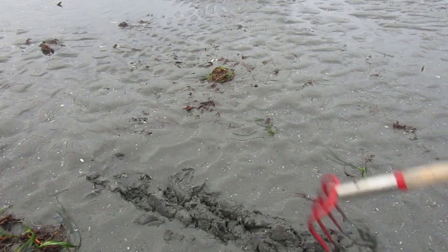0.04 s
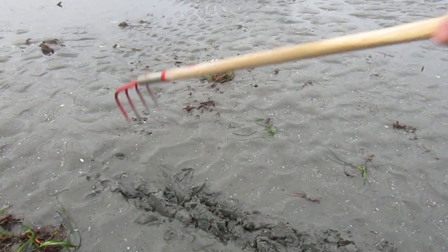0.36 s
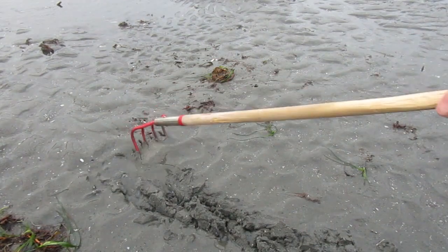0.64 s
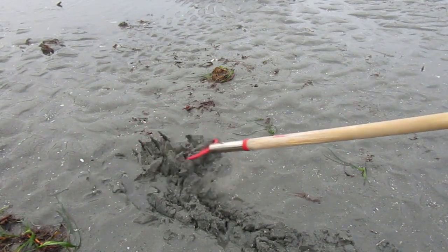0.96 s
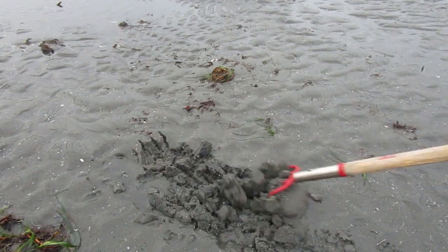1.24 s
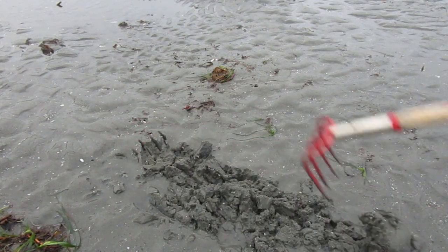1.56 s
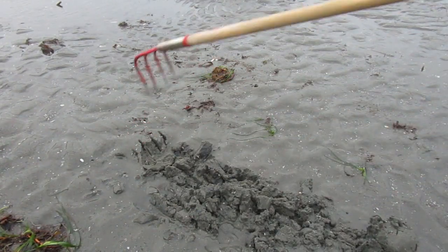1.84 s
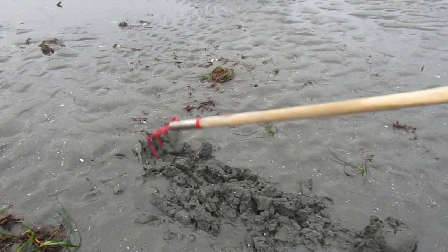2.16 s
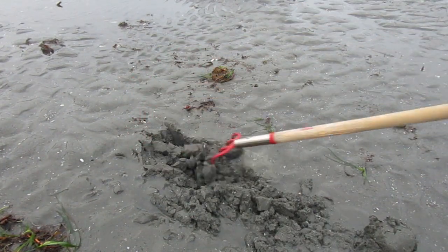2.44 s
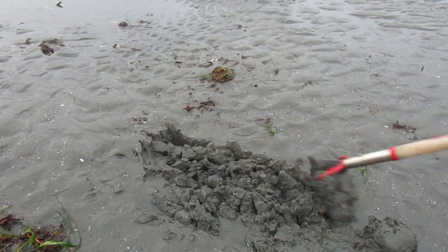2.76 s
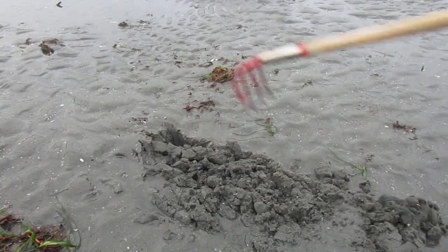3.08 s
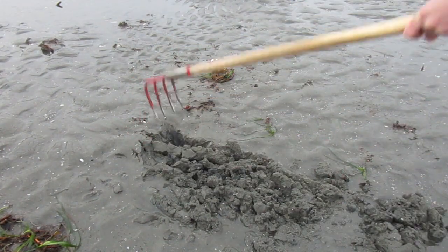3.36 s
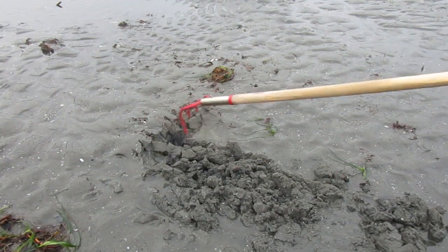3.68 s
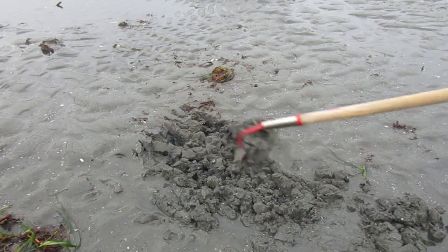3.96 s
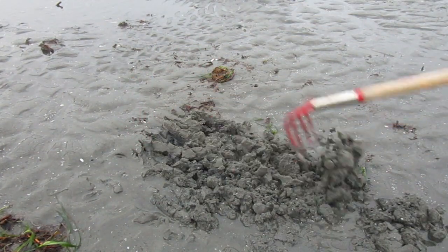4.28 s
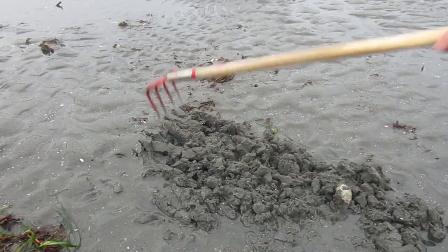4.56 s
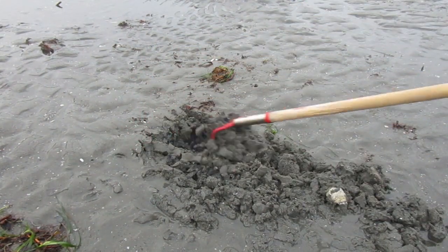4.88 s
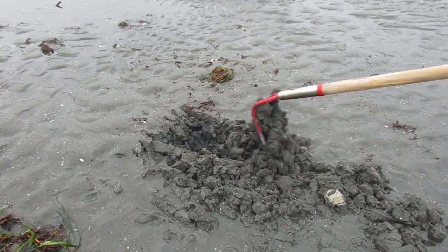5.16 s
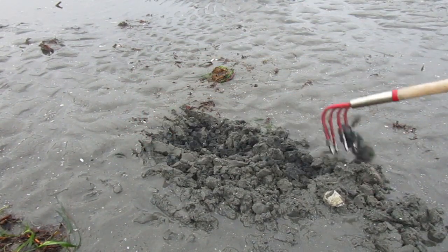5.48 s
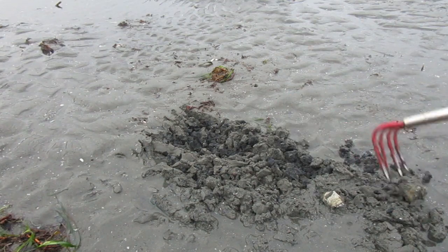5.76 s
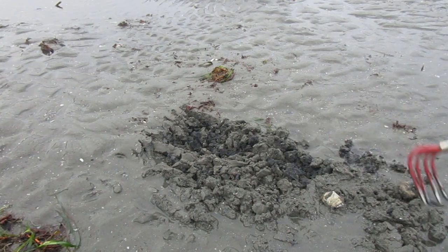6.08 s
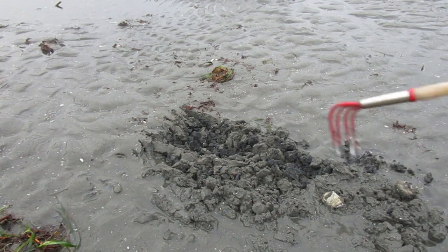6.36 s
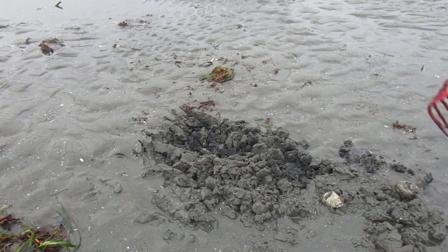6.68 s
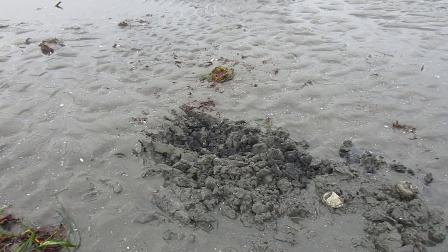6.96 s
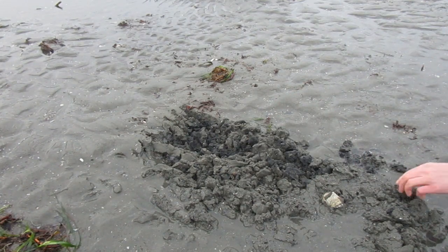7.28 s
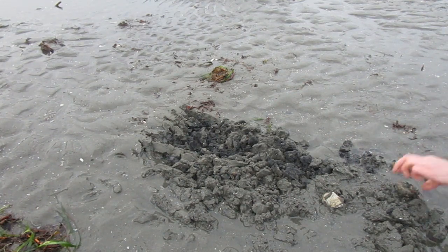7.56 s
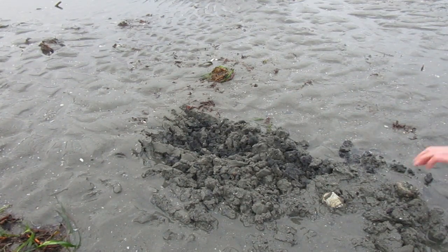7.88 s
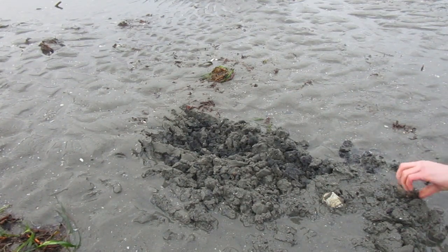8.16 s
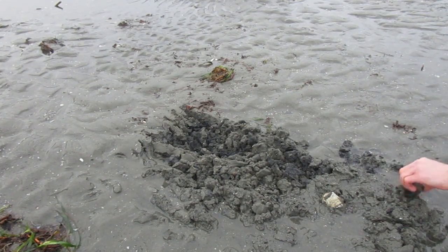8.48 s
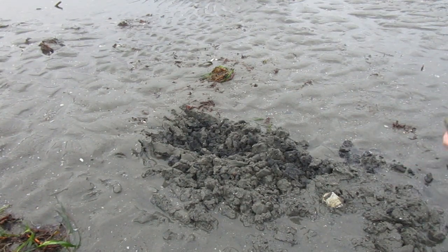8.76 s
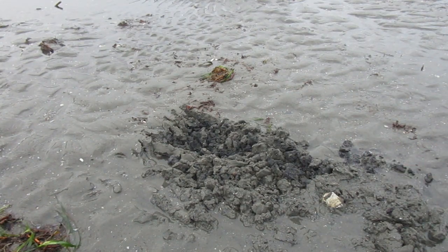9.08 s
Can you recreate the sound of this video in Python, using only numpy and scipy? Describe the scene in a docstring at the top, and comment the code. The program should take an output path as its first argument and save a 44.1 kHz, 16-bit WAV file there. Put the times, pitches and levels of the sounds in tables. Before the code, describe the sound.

A hand rake scrapes through wet sand in several gritty strokes while wind rumbles and thumps on the microphone.

```python
"""A four-tined hand rake is dragged through wet sand, four strokes, then fingers pick at the mud.
Its steel tines (the prongs) scrape sand, crunch and clink on shell, and flick out small wet ticks.
Around it lies a windy tidal flat: swirls of air, called eddies, rumble and thump on the microphone
over a soft hiss. The hardest thumps make the recorder turn everything down for a moment."""
import sys
import numpy as np
from scipy import signal
from scipy.fft import rfft, irfft, next_fast_len
from scipy.io import wavfile
from scipy.ndimage import uniform_filter1d, minimum_filter1d, map_coordinates

SR = 44100
rng = np.random.default_rng(int(sys.argv[2]) if len(sys.argv) > 2 else 0)


def output_pcm(signal):
    """Save a mono or channel-first signal as 16-bit PCM at the path in sys.argv[1].

    Samples are clipped to [-1, 1] before scaling.
    """
    pcm = np.clip(np.atleast_2d(signal).T, -1, 1) * 32767
    wavfile.write(sys.argv[1], SR, np.round(pcm).astype(np.int16))


N = 402633
T = np.arange(N) / SR


def undb(db):
    """Turn decibels into a number to multiply by."""
    return np.exp(np.asarray(db) * (np.log(10) / 20))


def unit(x):
    """Scale a signal to an average power of 1."""
    return x / np.sqrt(np.mean(x ** 2))


def curve(table):
    """Join (time, value) points with straight lines."""
    return np.interp(T, *np.transpose(table))


def gate(start, length, attack, release):
    """Fade in just before the start, hold at 1 for the length, then fade out."""
    return np.interp(T, np.cumsum([start - attack, attack, length, release]), [0, 1, 1, 0])


def colour(x, spectrum):
    """Shape the tone with (Hz, dB) points; white noise keeps its power."""
    hz, db = np.transpose(spectrum)
    size = next_fast_len(N + SR // 10)
    f = np.maximum(np.arange(size // 2 + 1) * SR / size, 1)
    octaves_outside = np.maximum(np.log2(hz[0] / f), 0) + np.maximum(np.log2(f / hz[-1]), 0)
    gain = undb(np.interp(np.log(f), np.log(hz), db) - 7.4 * octaves_outside)
    return irfft(rfft(x, size) * unit(gain), size)[:N]


def wander(rate):
    """A smooth random drift of typical size 1, with about `rate` turns a second."""
    step = max(int(SR / rate), 1)
    held = rng.standard_normal(N)[np.arange(N) // step]
    return unit(uniform_filter1d(held, step))


def grains(rate, spread_db):
    """Tiny random clicks, about `rate` a second: many small, a few large."""
    hit = rng.random(N) < rate / SR
    size = undb(spread_db * np.minimum(rng.exponential(size=N), 5))
    return unit(hit * size * rng.choice([-1, 1], N))


# The hiss over the flat. Each row: time in seconds, level in dB.
AIR_LEVELS = [(0, -47.5), (1.2, -43), (2.1, -40), (2.9, -44.5), (4.1, -38), (5.0, -38), (5.5, -35),
              (6.1, -40), (6.7, -44.5), (7.5, -42.5), (8.0, -47.5), (9.13, -45.5)]
# Its tone. Each row: frequency in Hz, relative level in dB.
AIR_TONE = [(200, 8), (450, -4), (680, -2.5), (950, 0.5), (1300, -4.5), (2000, -9.5), (3000, -14),
            (5000, -23.5), (8000, -31.5), (15000, -45)]

def air():
    """Moving air makes a broad, smooth hiss that slowly swells and sinks."""
    return colour(rng.standard_normal(N), AIR_TONE) * undb(curve(AIR_LEVELS) + .6 * wander(12))


# Moments when the wind drops. Each row: start in seconds, length in seconds, change in dB.
LULLS = [(0.157, 0.14, -8), (0.412, 0.051, -5), (1.089, 0.091, -13), (1.488, 0.079, -6.5),
         (2.447, 0.19, -3.5), (3.634, 0.017, -8), (6.66, 0.09, -17.5), (8.028, 0.42, -3.5),
         (8.438, 0.1, -14)]
# Gusts on the microphone. Each row: start in seconds, length in seconds, strength in dB.
GUSTS = [(0.564, 0.12, -23), (0.774, 0.049, -20), (0.872, 0.114, -27.5), (1.224, 0.03, -20),
         (1.34, 0.13, -22), (1.564, 0.06, -19), (1.761, 0.11, -24.5), (2.033, 0.21, -22.5),
         (2.251, 0.149, -25.5), (2.682, 0.25, -25.5), (2.967, 0.24, -25.5), (3.255, 0.18, -23.5),
         (3.51, 0.093, -23), (4.185, 0.057, -16.5), (4.26, 0.018, -29), (4.874, 0.47, -18.5),
         (5.591, 0.31, -20), (6.102, 0.034, -22), (6.253, 0.18, -21), (6.53, 0.062, -19.5),
         (6.768, 0.096, -19), (6.966, 0.22, -22), (7.416, 0.12, -20), (7.59, 0.073, -11.5),
         (7.677, 0.2, -21), (7.939, 0.075, -21.5), (8.112, 0.067, -21), (8.642, 0.067, -20),
         (8.802, 0.065, -24.5), (8.981, 0.055, -19.5)]

def gustiness(breeze_db, usual_breeze_db=-27.5, usual_calm_db=-28.5, follow=0.9):
    """Strength of the small eddies in dB: they follow the breeze, sink in lulls and leap in gusts."""
    calm_db = usual_calm_db + follow * (breeze_db - usual_breeze_db)
    calm_db += sum(db * gate(start, length, 0.017, 0.017) for start, length, db in LULLS)
    gusts = sum(undb(db) * gate(start, length, 0.016, 0.013) for start, length, db in GUSTS)
    return 20 * np.log10(np.maximum(undb(calm_db), gusts))


def eddy(t, hz):
    """One eddy passing the microphone: the air pushes, then sucks."""
    phase = 2 * np.pi * hz * t
    return -16 / np.sqrt(27) * phase / (1 + phase * phase) ** 2


def lesser_eddies(gust_db, rate=30, over_gust_db=7.0, scatter_db=3, hz=215, scatter_octaves=0.19):
    """List loosely spaced eddies for thumps() to play; stronger gusts bring stronger ones."""
    timing, size, pitch = rng.standard_normal((int(rate * N / SR), 3)).T
    when = np.clip((np.arange(len(timing)) + timing / 3) / rate, 0, T[-1])
    db = np.interp(when, T, gust_db) + over_gust_db + scatter_db * np.tanh(size)
    return np.column_stack([when, db, hz * 2 ** (scatter_octaves * pitch)])


def thumps(eddies, wake_db=-11, wake_s=0.00299, wake_speedup=1.09, wake_count=3):
    """Each eddy thumps the microphone amid a few smaller, quicker ones: its wake."""
    out = np.zeros(N)
    for (when, db, hz), draws in zip(eddies, rng.standard_normal((len(eddies), wake_count, 2))):
        near = slice(max(int((when - .03) * SR), 0), int((when + .03) * SR))
        t = T[near] - when
        wake = sum(np.tanh(2 * size) * eddy(t - wake_s * (lag + np.sign(lag) / 2), hz * wake_speedup)
                   for lag, size in draws)
        out[near] += undb(db) * (eddy(t, hz) + undb(wake_db) * wake)
    # the pressure swings back on both sides of each eddy, so little deep bass is left
    return undb(-5.0) * signal.sosfiltfilt(signal.butter(2, 70, "high", fs=SR, output="sos"), out)


# The slow breeze. Each row: time in seconds, strength in dB.
BREEZE = [(0, -35), (1.0, -32), (1.6, -28.5), (2.15, -28.5), (2.75, -32.5), (3.6, -31), (4.1, -23.5),
          (4.8, -24.3), (5.3, -23), (5.8, -26), (6.4, -28), (7.2, -27), (8.2, -29.5), (9.13, -32.5)]
# Tones of the large, small and smallest eddies. Each row: frequency in Hz, relative level in dB.
RUMBLE_TONE = [(15, -22.5), (30, -9.5), (55, -3.5), (100, 0.5), (170, -3), (260, -11), (400, -41.5),
               (700, -55)]
FLUTTER_TONE = [(100, -0.5), (220, 1), (330, 1.5), (450, -5.5), (650, -18), (1000, -33.5), (1600, -33.5),
                (3000, -72.5)]
TEARING_TONE = [(300, 7.5), (600, 7.5), (950, -2.5), (1400, -16.5), (2200, -33), (3500, -67)]
# Strong single eddies. Each row: time in seconds, strength in dB, main frequency in Hz.
STRONG_EDDIES = [(.384, -6.5, 193), (.494, -6, 176), (.643, -6, 162), (.781, -10, 271), (.814, -10, 190),
                 (.9, -12.5, 218), (.947, -11, 159), (1.242, -5.5, 201), (1.351, -2, 217),
                 (1.397, -5.5, 179), (1.424, -6.5, 255), (1.436, -3.5, 163), (1.565, -7.5, 148),
                 (1.607, -6.5, 210), (1.675, 0, 190), (1.782, -1.5, 155), (1.858, -2.5, 159),
                 (2.068, -2.5, 271), (2.08, -0.5, 162), (2.108, 0.5, 199), (2.151, 9, 245),
                 (2.264, -1.5, 183), (2.286, -9.5, 268), (2.304, 1.5, 174), (2.375, -7.5, 180),
                 (2.573, -8.5, 155), (2.702, -7, 248), (2.729, -7, 200), (3.272, -11, 178),
                 (3.704, -6, 175), (3.8, -6, 178), (4.195, -5, 236), (4.21, -2.5, 153), (4.315, -0.5, 200),
                 (4.667, -7.5, 130), (4.739, 3.5, 218), (4.94, 2, 232), (4.953, -10, 119), (4.958, -7, 237),
                 (4.971, 13, 210), (5.219, 4, 136), (5.351, -6, 150), (5.417, 1.5, 115), (5.443, -3, 200),
                 (5.681, -4.5, 166), (5.783, 2, 172), (5.827, 1, 236), (5.857, -1, 208), (6.015, -6, 199),
                 (6.089, -7.5, 160), (6.203, -2, 151), (6.269, -2, 192), (6.298, 5.5, 124), (6.33, -6, 189),
                 (6.363, -3.5, 167), (6.379, -7, 244), (6.522, 0, 147), (6.586, -3, 256), (6.602, 0.5, 193),
                 (6.617, 6.5, 285), (6.88, -8, 298), (6.974, 0, 235), (6.998, 6, 238), (7.024, -10, 200),
                 (7.054, -0.5, 178), (7.093, -6, 230), (7.147, -5.5, 260), (7.153, 0, 200),
                 (7.176, -2.5, 246), (7.24, -7, 165), (7.521, -4, 220), (7.526, 5.5, 308), (7.571, -5, 237),
                 (7.601, 0.5, 403), (7.617, 0, 280), (7.699, -4, 323), (7.74, 1.5, 237), (7.759, -5, 283),
                 (7.841, -3.5, 410), (7.867, -3.5, 145), (7.927, 6.5, 209), (8.039, -9, 199),
                 (8.072, -7, 186), (8.107, -9, 266), (8.155, -6.5, 160), (8.214, -11.5, 208),
                 (8.364, -11.5, 200), (8.639, -2, 260), (8.693, 2, 200), (9.025, -6.5, 180)]

def wind(rumble_follow=0.68, usual_gust_db=-28, flutter_limit_db=-17.5, tearing_growth=2.56):
    """Large eddies rumble, small ones flutter in quick flurries, and hard gusts tear off the smallest."""
    breeze_db = curve(BREEZE)
    gust_db = gustiness(breeze_db)
    excess_db = gust_db - usual_gust_db
    eddy_db = np.minimum(gust_db, flutter_limit_db)  # harder gusts only add more tearing
    flurry = np.minimum(wander(90), 1.2)
    rumble = colour(rng.standard_normal(N), RUMBLE_TONE) * unit(undb(3.05 * flurry))
    rumble *= undb(breeze_db + rumble_follow * np.minimum(excess_db, 4))  # lulls quiet the bass too
    flutter = rng.standard_normal(N) * unit(undb(7.1 * flurry + 4.0 * np.tanh(wander(260))))
    flutter = colour(flutter * undb(eddy_db), FLUTTER_TONE)
    tearing = rng.standard_normal(N) * unit(undb(3.9 * flurry))
    tearing = colour(tearing * undb(tearing_growth * excess_db - 60.5), TEARING_TONE)
    thumping = thumps(STRONG_EDDIES) + thumps(lesser_eddies(eddy_db))
    return undb(5.0) * rumble + undb(-2.0) * flutter + tearing + thumping


# The tone of fine wet spray, also used by rake(). Each row: frequency in Hz, relative level in dB.
SPRAY_TONE = [(4000, -12), (6800, -3), (7900, -4.5), (8800, -5.5), (11200, -8), (12200, -12.5),
              (15000, -18)]

def seeping():
    """Water fizzes faintly in the turned mud and fades near the end."""
    level_db = curve([(7.3, -73.5), (7.7, -84)])
    return colour(grains(160, 2.4), SPRAY_TONE) * undb(level_db + 4.6 * wander(4.5))


# Drops, bursting films and opening air pockets. Each row: start in seconds, strength in dB, pitch in Hz.
WET_TICKS = [(1.699, -39, 9950), (1.805, -32, 6000), (1.863, -35, 7500), (2.88, -35, 11500),
             (3.041, -33, 5800), (3.167, -27.5, 3900), (3.166, -21.5, 2150), (3.767, -18, 2300),
             (3.795, -16, 2800), (3.809, -29, 3100), (3.826, -21, 2000), (3.848, -28, 1950),
             (3.942, -17, 5100), (3.999, -18, 1750), (4.098, -19, 2300), (4.357, -35, 7750),
             (4.451, -32, 6160), (5.596, -24, 5500), (5.615, -20, 3950), (5.631, -29, 9500),
             (5.727, -31, 10200), (6.304, -23, 5350), (6.305, -31, 10500), (8.431, -40, 11000)]

def wet_ticks(ring_at_1khz_s=0.016, crack_gain=0.29, glide=0.024):
    """A soft crack and a short ring that rises as the pocket closes; big, low pockets ring longest."""
    out, t = np.zeros(N), T[:SR // 20]
    for (start, db, hz), noise in zip(WET_TICKS, rng.standard_normal((len(WET_TICKS), len(t)))):
        ring_s = ring_at_1khz_s * np.sqrt(1000 / hz)
        ring = np.sin(2 * np.pi * hz * t * (1 + glide * t / ring_s)) * undb(-60 * t / ring_s)
        crack = crack_gain * uniform_filter1d(noise, size=2) * np.exp(-t / 0.0017)
        i = int(start * SR)
        out[i:i + len(t)] += 0.63 * undb(db) * (ring + crack)
    return out


# The four tines' own notes, then their higher ones.
# Each row: pitch in Hz, relative level in dB, seconds to fade by 60 dB.
TINE_NOTES = [(2286, -12, 0.071), (2610, -16.5, 0.12), (2940, -15, 0.11), (3360, -13.5, 0.048),
              (5170, 0.5, 0.027), (5620, -4, 0.055), (7070, -19, 0.026), (8700, -6, 0.034),
              (10500, -19.5, .025)]

def tines(push):
    """The steel tines ring, muffled by the mud; their pitch wanders as it loads and frees them."""
    t = T[:SR // 8]
    ring = sum(undb(db - 60 * t / ring_s) * np.sin(2 * np.pi * hz * t) for hz, db, ring_s in TINE_NOTES)
    ringing = signal.fftconvolve(grains(3000, 0.92), ring / np.linalg.norm(ring))[:N]
    clock = np.cumsum(1 + .02 * wander(12))  # an uneven clock bends the pitch
    return push * map_coordinates(ringing, [clock], mode="mirror")


# A tine meets a shell. Each row: start in seconds, strength in dB, contact time in seconds,
# pitch of the struck tine in Hz, pitch bend at first touch in octaves.
CLINKS = [(2.012, -35.5, 0.011, 3380, .09), (3.439, -39.5, 0.0092, 3380, .04),
          (3.939, -34, 0.004, 2930, 0.0074), (4.096, -37, 0.004, 2880, 0.0096),
          (4.668, -43, 0.0067, 3380, 0.064), (6.277, -39, 0.011, 2270, -0.058),
          (6.282, -42.5, 0.0095, 2950, -.06), (6.302, -32.5, 0.0047, 2700, -0.024),
          (6.322, -58, 0.0033, 5700, -0.00021)]

def clinks(struck_db=14, others_db=-7, struck_width_octaves=0.087, chatter_hz=60):
    """The struck tine rings above the others, chatters and bends as it scrapes, then dies away."""
    out, t = np.zeros(N), T[:SR // 7]
    for start, level_db, contact_s, struck_hz, bend in CLINKS:
        i = int(start * SR)
        swell = np.minimum(t / contact_s, 1)
        free_s = np.maximum(t - contact_s, 0)
        clock = np.cumsum(2 ** (bend * np.exp(-t / contact_s))) / SR
        for hz, db, ring_s in TINE_NOTES:
            closeness = np.exp(-(np.log2(hz / struck_hz) / struck_width_octaves) ** 2)
            # rubbing blurs the high notes most
            blur_hz = chatter_hz * hz / struck_hz * np.exp(-free_s / contact_s)
            chatter = np.cumsum(rng.standard_normal(len(t)) * np.sqrt(2 * np.pi * blur_hz / SR))
            note = np.sin(2 * np.pi * hz * clock + chatter)
            note_db = level_db + db + struck_db * closeness + others_db * (1 - closeness)
            out[i:i + len(t)] += swell * undb(note_db - 60 * free_s / ring_s) * note
    return out


# The tone of sand grains, also used by rake(). Each row: frequency in Hz, relative level in dB.
SAND_TONE = [(500, -32), (1200, -8), (2100, -2.5), (4150, -0.5), (4750, 0), (5750, -2), (6400, -7),
             (7950, -16.5), (8700, -15.5), (14000, -25.5)]

def pores(force, rate=330, ring_cycles=16, low_hz=1700, high_hz=11500):
    """Tiny water-filled gaps in the sand pop open, each ringing briefly at its own pitch."""
    out, t = np.zeros(N + SR // 50), T[:SR // 50]
    for when, pitch in rng.random((int(rate * N / SR), 2)):
        i, hz = int(when * N), low_hz * (high_hz / low_hz) ** pitch
        pop = np.sin(2 * np.pi * hz * t) * undb(-20 * hz * t / ring_cycles)
        out[i:i + len(t)] += force[i] * pop
    return colour(out, SAND_TONE)


def crackle(force):
    """Now and then a coarser grain snaps past a tine and stands out of the scrape."""
    return colour(grains(150, 2.2) * force, SAND_TONE)


# Wet hollows round the tines. Each row: pitch in Hz, width in Hz, relative level in dB.
HOLLOWS = [(2410, 400, -16), (3370, 450, -13), (4790, 350, -9), (5610, 270, -10), (9000, 800, -8.5),
           (10900, 1100, -11)]

def hollows(scrape, swing_db=4.5, rate=14):
    """Wet hollows open and close; each boosts the scrape near its own pitch."""
    boost = np.zeros(N)
    for hz, width, db in HOLLOWS:
        band = signal.lfilter(*signal.iirpeak(hz, hz / width, fs=SR), scrape)
        boost += band * undb(db + swing_db * np.tanh(wander(rate)))
    return scrape + boost


# The tail of a pull already ending, then four pulls of the rake. Each row: start in seconds,
# length in seconds, starting strength in dB, swell in dB as mud piles up before the tines.
STROKES = [(0, 0.0063, -57.5, 5.5), (0.553, 0.88, -52.5, 7), (2.101, 0.73, -47.5, 2),
           (3.514, 0.64, -48.5, 6.5), (4.733, 0.24, -42.5, -2.5)]
# Clods landing and fingers working the mud.
# Each row: start in seconds, length in seconds, strength in dB, spray compared with sand in dB.
SQUELCHES = [(4.378, 0.27, -63, -2), (5.256, 0.22, -62, 1.5), (5.568, 0.19, -60, 6),
             (7.072, 0.25, -62.5, -10), (7.841, 0.076, -49, -20), (8.465, 0.081, -73.5, 6)]

def effort(attack_s=0.048, release_s=.06, peak_share=0.84, ease_db=-3,
           spray_start_db=-13, spray_growth_db=8, crumbs_db=-18, crumbs_fade_db_per_s=10):
    """How strongly sand and spray are stirred: pulls swell and trail off; clods and fingers squelch."""
    sand, spray = np.zeros(N), np.zeros(N)
    for start, length, db, swell_db in STROKES:
        progress = np.clip((T - start) / length, 0, 1)
        since_end = np.maximum(T - start - length, 0)
        # the pull peaks, then eases as the rake starts to lift
        shape_db = np.interp(progress, [0, peak_share, 1], [0, swell_db, swell_db + ease_db])
        force = undb(db + shape_db) * np.clip(1 + (T - start) / attack_s, 0, 1)
        pull = force * np.exp(-since_end / release_s)
        # wet crumbs drop from the lifted rake
        crumbs = (force - pull) * undb(crumbs_db - crumbs_fade_db_per_s * since_end)
        sand += pull + crumbs * undb(-1)
        # spray grows as the tines speed up
        spray += pull * undb(spray_start_db + spray_growth_db * progress ** 3) + crumbs
    for start, length, db, spray_db in SQUELCHES:
        press = undb(db) * gate(start, length, 0.04, 0.04)
        sand += press
        spray += press * undb(spray_db)
    return sand, spray


# The tone of coarse shell grit. Each row: frequency in Hz, relative level in dB.
GRIT_TONE = [(600, -7), (1200, -0.5), (1800, 6.5), (2800, 4), (3300, -3.5), (5000, -36), (9000, -56)]
# Short gritty crunches of the tines, and one sharp crack on a hard wind thump.
# Each row: start in seconds, strength in dB, length in seconds, grit compared with the crunch in dB.
CRUNCHES = [(0.059, -50.5, 0.029, -16), (0.473, -44, 0.023, -3), (0.73, -53.5, 0.084, -4),
            (0.908, -53, 0.042, -19), (1.174, -48.5, 0.1, -27), (2.009, -41, 0.03, -15),
            (2.075, -50, 0.07, -13), (2.492, -44, 0.0081, -14), (2.69, -51, 0.021, -15),
            (2.775, -55, 0.023, -20), (3.438, -41, 0.021, -8), (3.49, -52, 0.062, -8),
            (3.779, -37.5, 0.043, -5), (3.791, -55, 0.08, 16), (3.939, -33, 0.008, -25),
            (4.098, -41, 0.0059, 2), (4.645, -39, 0.028, -6), (4.667, -39, 0.017, -8),
            (5.208, -42, 0.0093, -11), (5.645, -45, 0.058, 1), (6.165, -46.5, 0.028, -1),
            (6.263, -46, 0.013, -5), (6.613, -39, 0.004, 7.5), (6.872, -46, 0.036, -15)]

def rake(stroke_grit_db=-9, crunch_spray_db=-12, ring_db=-14, crunch_rise_share=0.36):
    """Tines scrape through sand, wet spray and grit, slipping unevenly, with short crunches on top."""
    lumps = undb(2.1 * wander(9))
    pull, wet = effort() * lumps
    crunches, grit_force = np.zeros(N), pull * undb(stroke_grit_db)
    for start, db, length, grit_db in CRUNCHES:
        near = slice(int(start * SR) + 1, int((start + 2 * length) * SR))
        age = (T[near] - start) / length
        crunch = undb(db) * np.minimum(age / crunch_rise_share, 1) * np.exp(-age ** 3)
        crunches[near] += crunch
        grit_force[near] += crunch * undb(grit_db)
    sand_force = pull + undb(-0.8) * crunches
    spray_force = wet + undb(crunch_spray_db) * crunches
    slip = undb(.8 * wander(45) + wander(250))
    sand = undb(-1.8) * colour(grains(4200, 1.1) * sand_force * slip, SAND_TONE)
    scrape = hollows(sand + undb(-6.0) * pores(sand_force) + undb(-7) * crackle(sand_force))
    spray = undb(-0.6) * colour(grains(3000, 1.9) * spray_force * slip, SPRAY_TONE)
    grit = undb(3.0) * colour(grains(1400, 1.4) * grit_force * slip, GRIT_TONE)
    return scrape + spray + grit + tines(sand_force * undb(ring_db))


def scene():
    """Everything reaches one microphone in open air."""
    return (wind() + air() + rake() + clinks() + wet_ticks() + seeping())[None]


def limiter(x, ceiling_db=-.2, attack_s=.003, recovery_db_per_s=6.5):
    """The recorder turns down just ahead of any peak that is too loud, then slowly comes back up."""
    over_db = np.maximum(20 * np.log10(np.abs(x) + 1e-9) - ceiling_db, 0)
    recovered_db = recovery_db_per_s * T
    cut_db = np.maximum.accumulate(over_db + recovered_db, axis=-1) - recovered_db
    ease = np.hanning(int(attack_s * SR))
    ahead_db = minimum_filter1d(-cut_db, len(ease))
    return x * undb(signal.fftconvolve(ahead_db, ease[None] / ease.sum(), "same"))


def record(dry):
    """The hardest thumps turn everything down, and the highest treble is cut off."""
    treble_cut = signal.ellip(10, .2, 80, 15050, fs=SR, output="sos")
    return signal.sosfilt(treble_cut, limiter(dry))


dry = scene()
out = record(dry)
output_pcm(out)
```